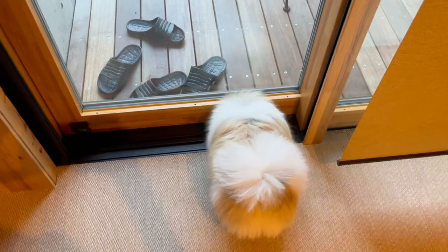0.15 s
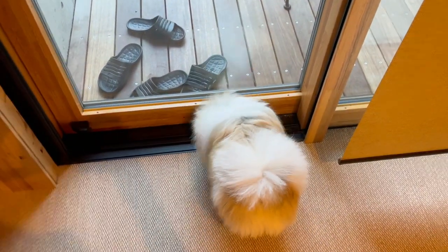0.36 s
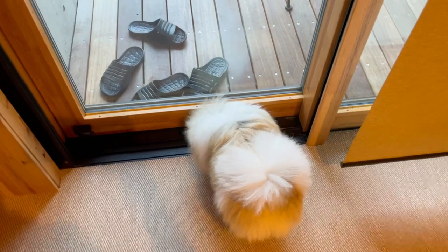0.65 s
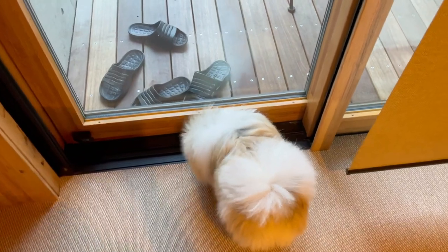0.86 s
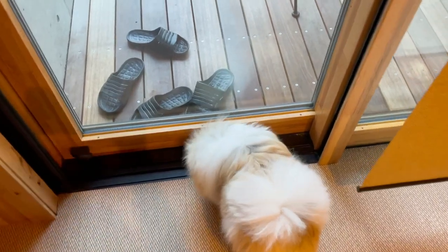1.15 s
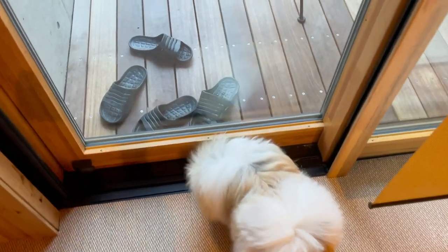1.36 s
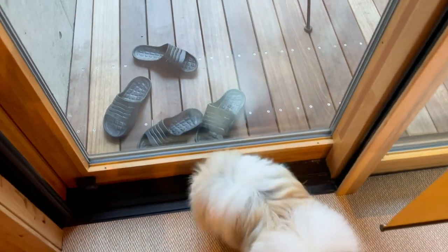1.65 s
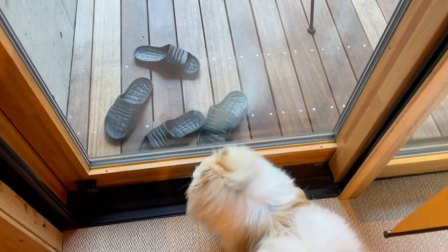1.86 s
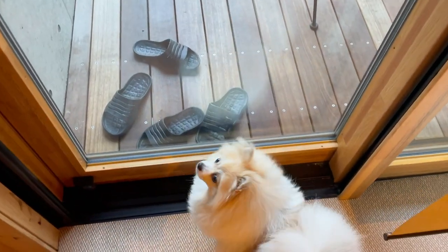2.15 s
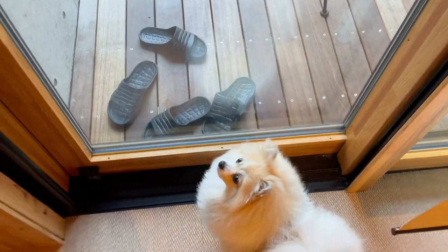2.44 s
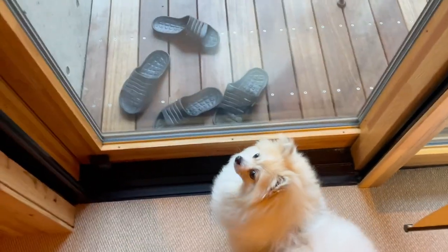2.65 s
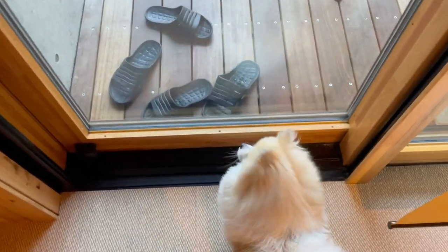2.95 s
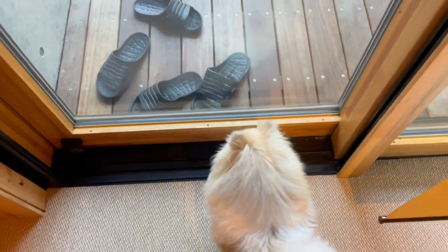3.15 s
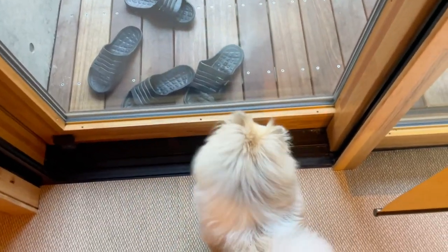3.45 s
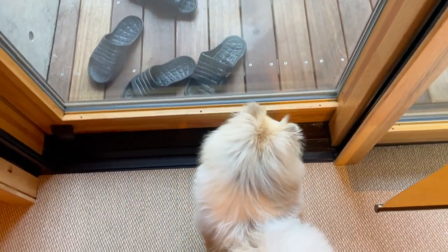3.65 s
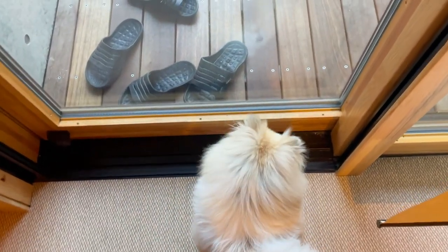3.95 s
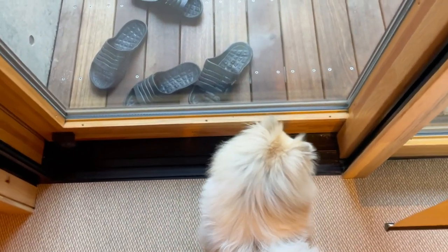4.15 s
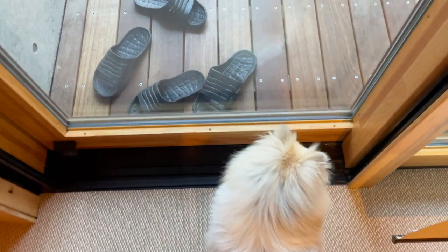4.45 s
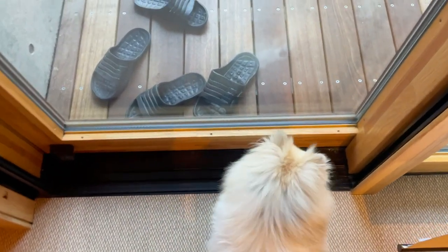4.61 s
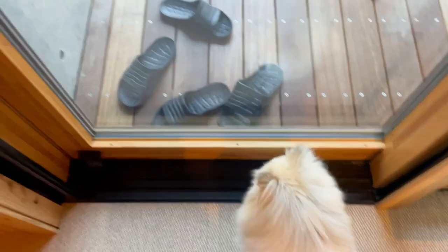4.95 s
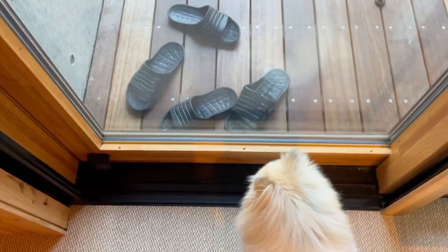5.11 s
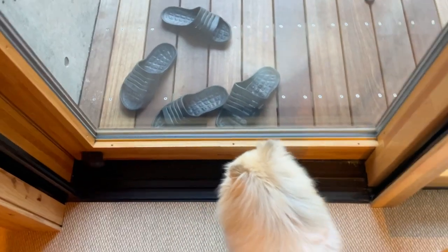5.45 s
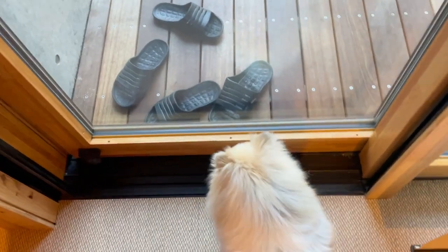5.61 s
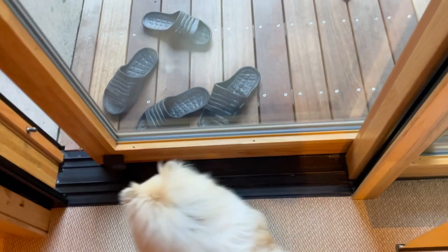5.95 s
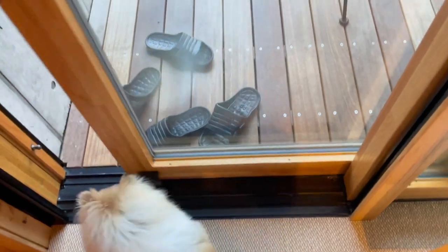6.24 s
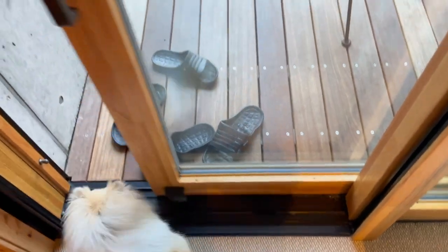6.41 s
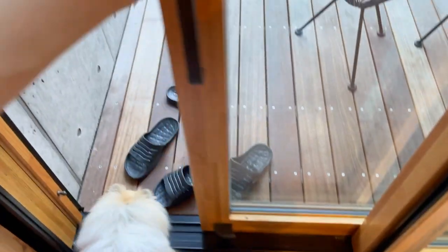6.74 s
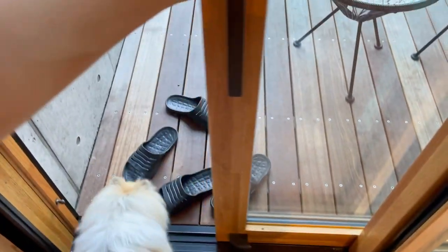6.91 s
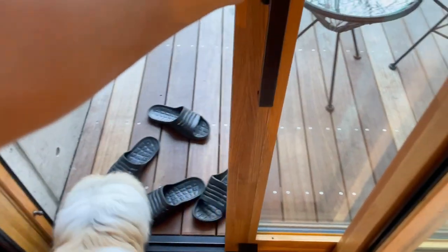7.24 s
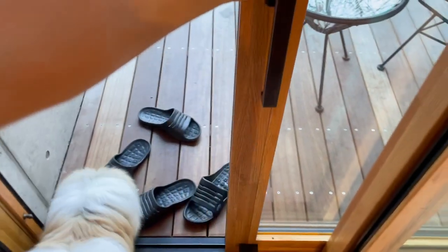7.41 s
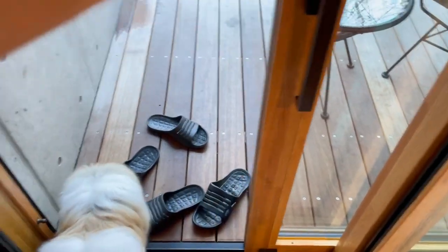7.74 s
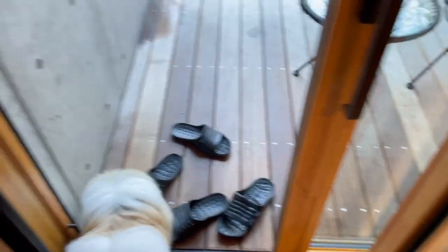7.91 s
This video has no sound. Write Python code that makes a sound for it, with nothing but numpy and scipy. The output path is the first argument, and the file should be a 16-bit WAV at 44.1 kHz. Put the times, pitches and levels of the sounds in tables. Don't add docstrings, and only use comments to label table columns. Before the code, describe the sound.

In a quiet rumbling room, soft paw steps and small metal ticks lead to a latch clunk, then a glass door scrapes and rolls open, hissing.

```python
import sys
import numpy as np
from scipy import signal
from scipy.fft import rfft, irfft, next_fast_len
from scipy.io import wavfile
from scipy.ndimage import uniform_filter1d

SR = 44100
rng = np.random.default_rng(int(sys.argv[2]) if len(sys.argv) > 2 else 0)


def invert_db(level):
    return 10 ** (np.asarray(level, dtype=float) / 20)


def master(y):
    cut = np.clip(np.atleast_2d(y).T, -1, 1)
    pcm = np.round(cut * 32767)
    wavfile.write(sys.argv[1], SR, pcm.astype(np.int16))


N = 355887
THUMP_S = 4.632

# start_s, peak_db, brightness_db, ringing_db, t60_factor
LATCH = [
    (2.104, -27, 3, 10, 1.6),
    (4.3818, -36, -16, 15, 0.9),
    (4.623, -34, -4, 5.5, 0.75),
    (4.628, -25, 0, -12, 0.95),
    (4.642, -32, -15, 10, 1.2),
]


def evened(x):
    return x / np.sqrt(np.mean(x ** 2) + 1e-20)


def read(points, hz):
    f, value = np.transpose(points)
    return np.interp(np.log(hz + 1), np.log(f + 1), value)


def add(mix, s, sound):
    part = mix[round(s * SR):][:len(sound)]
    part += sound[:len(part)]


def band(x, lo_hz, hi_hz):
    sos = signal.butter(2, [lo_hz, min(hi_hz, SR / 2.1)], "band", fs=SR, output="sos")
    return signal.sosfilt(sos, x)


def split(x, low_hz, high_hz, soft):
    size = next_fast_len(N)
    hz, spectrum = np.fft.rfftfreq(size, 1 / SR), rfft(x, size)
    low = np.clip((low_hz - hz) / (soft * low_hz), 0, 1)
    high = np.clip((hz - high_hz) / (soft * high_hz), 0, 1)
    return (irfft(spectrum * share, size)[:N] for share in (low, 1 - low - high, high))


def resonate(x, hz, width):
    turn = np.exp(2j * np.pi * np.cumsum(hz * np.ones(len(x))) / SR)
    r = np.exp(-np.pi * width / SR)
    return 2 * (turn * signal.lfilter([1 - r], [1, -r], x / turn + 1e-18)).real


def noise(tone, patchy_db, size):
    hop, hz = size // 4, np.fft.rfftfreq(size, 1 / SR)
    a, b, patches = rng.standard_normal((N // hop + 5, len(hz), 3)).T
    patches = uniform_filter1d(patches, size=7, axis=0)
    patches = evened(uniform_filter1d(patches, size=12, axis=1))
    z = (a + 1j * b) * invert_db(read(tone, hz)[:, None] + patchy_db * patches)
    return signal.istft(z, nperseg=size, noverlap=size - hop)[1][:N]


def curves(rows):
    s, *columns = np.transpose(rows)
    t = np.arange(N) / SR
    lasts = s[-1] > t[-1] - .02
    gate = np.clip(np.minimum(t - s[0], s[-1] - t + lasts) / .012, 0, 1)
    return gate, *(np.interp(t, s, c) for c in columns)


def glide(start, end, from_hz, to_hz, db, ends_db):
    on = slice(int(start * SR), min(int(end * SR), N))
    u = np.linspace(0, 1, on.stop - on.start)
    lasts = end * SR > N - 900
    edges = np.clip(np.minimum(u, 1 - u + lasts) * (end - start) / .012, 0, 1)
    droop = np.where((u > .5) & lasts, 0, (2 * u ** (1 if lasts else .7) - 1) ** 2)
    return on, from_hz + (to_hz - from_hz) * u, edges * invert_db(db + ends_db * droop)


def three_layers(x, db, body_db, fizz_db):
    body, hiss, fizz = map(evened, split(x, 2300, 8000, .3))
    return invert_db(db) * hiss + invert_db(body_db) * body + invert_db(fizz_db) * fizz


def grit(per_s, spread_db, share):
    strength = invert_db(spread_db * np.minimum(rng.exponential(1, N), 4))
    catches = strength * (rng.random(N) < per_s / SR)
    return 1 + share * evened(signal.lfilter([1], [1, -.985], catches))


def ring(modes, stretch=1, size=SR // 2, snap=0.83):
    t = np.arange(size) / SR
    return sum(invert_db(db - 60 * t / (t60 * stretch)) * np.sin(2 * np.pi * hz * t) * (1 - np.exp(-t * hz * snap))
               for hz, db, t60 in modes)


def crack(t60, bright_db, hz=2500):
    t, burst = np.arange(SR // 8) / SR, rng.standard_normal(SR // 8)
    dull = evened(band(band(burst, hz / 3.3, hz * 1.81), hz / 4, hz * 6.8)) * invert_db(-60 * t / t60)
    edge = evened(band(band(burst, 10800, 14500), 6300, 14680))
    return 0.51 * (dull + edge * invert_db(bright_db - 1.5 - 110 * t / t60))


def room():
    # pitch_hz, level_db per Hz
    room_tone = [(12, -66), (20, -30), (32, -14), (43, -13), (65, 0.5), (77, -9), (88, -28.5), (123, -21.5),
                 (222, -28.5), (337, -38), (499, -33.5), (558, -52.5), (5680, -68.5), (8650, -65.5),
                 (13300, -73), (14600, -100)]
    # start_s, level_db
    rumble_swell = [(0.0, -50), (0.22, -38.5), (0.36, -48.5), (0.56, -43), (0.87, -44), (0.97, -76),
                    (1.08, -45), (2.49, -44), (2.63, -36.5), (2.72, -49), (2.88, -37), (3.0, -43.5),
                    (4.25, -46), (4.52, -39.5), (5.03, -47.5), (5.17, -34), (5.36, -40.5), (8.07, -46.5)]
    air = invert_db(-49) * evened(noise(room_tone, patchy_db=2.5, size=2048))
    _, rumble_db = curves(rumble_swell)
    rumble, drone, hiss = split(air, 105, 330, .2)
    lumps = np.sqrt(uniform_filter1d(rumble ** 2, size=6000) + 1e-9)
    t = np.arange(N) / SR
    after, hit = np.maximum(t - THUMP_S, 0), t > THUMP_S
    shake_t60_s, boom_t60_s = .9, 0.36
    low = np.hypot(invert_db(rumble_db), hit * invert_db(-30 - 60 * after / shake_t60_s))
    drone_db = -56.5 + 1.48 * t
    high = np.hypot(invert_db(drone_db), hit * invert_db(-31 - 60 * after / boom_t60_s))
    return low * rumble / lumps + high * evened(drone) + hiss


def rustle():
    # start_s, level_db
    brushing = [(0.0, -87.5), (0.76, -93), (0.93, -84), (1.2, -81.5), (1.5, -92), (2.05, -75),
                (2.31, -57.5), (2.54, -67), (2.8, -76), (2.98, -69), (3.28, -81), (3.61, -69.5),
                (4.1, -75.5), (4.55, -69), (4.77, -64.5), (4.9, -91.5), (5.3, -64), (5.56, -72)]
    # pitch_hz, level_db per Hz
    brush_tone = [(180, -18.5), (300, 0), (354, 4), (405, 1.5), (574, -8.5), (814, -3.5), (1100, -8),
                  (4990, -20.5), (8640, -19), (12500, -9), (13600, -14), (14800, -57.5)]
    gate, db = curves(brushing)
    tread = invert_db(-85.5 + 5.5 * np.arange(N) / SR)
    body_db = 20 * np.log10(np.hypot(tread, invert_db(db + 4)))
    fizz_db = -74.5 + 0.72 * (db + 70.0)
    rub = noise(brush_tone, patchy_db=2.8, size=512) * grit(110, 4.7, 0.067)
    return gate * three_layers(rub, db, body_db, fizz_db)


def strokes():
    # start_s, length_s, level_db, pitch_hz, share of the stroke spent rising
    brushes = [(0.338, 0.12, -70.5, 3500, 1), (0.449, 0.029, -64, 6000, 0.9),
               (4.615, 0.012, -53, 4000, 0.9), (0.858, 0.19, -72.5, 5400, 0.68),
               (1.148, 0.21, -79, 6040, 0.45), (1.549, 0.066, -76.5, 4070, 0.02),
               (1.979, 0.021, -69, 7000, 0.4), (2.783, 0.17, -57, 4000, 0.2),
               (3.438, 0.16, -56, 4300, 0.54), (3.585, 0.19, -60.5, 3950, 0.4),
               (5.19, 0.031, -64, 4500, 0.5)]
    # start_s, length_s, level_db, pitch_hz
    scuffs = [(0.5, 0.063, -66, 790), (2, 0.041, -51.5, 2300), (2.318, .008, -45.5, 5900),
              (2.5, .008, -52.5, 4500), (2.478, 0.02, -58, 5000), (3, .02, -65, 4000), (2, .02, -75, 4800),
              (6.785, 0.035, -41, 2900), (6.5, 0.071, -54, 5100), (2.5, 0.15, -58, 1500),
              (2, 0.038, -45, 340), (2.5, 0.042, -46, 440), (2.5, 0.047, -50, 630), (2, 0.023, -70, 1100),
              (3.94, 0.22, -62.5, 1570), (3.85, .3, -60, 420), (4, 0.083, -54, 400), (4.385, .07, -53, 350),
              (0.8, .12, -62.5, 340), (0.0, .05, -73, 700), (0.168, .005, -76, 6500), (4, .016, -55, 3600),
              (4.5, .04, -50.5, 520), (5.5, 0.015, -58.5, 4000), (6.5, .025, -46, 4400),
              (7.1, .12, -54, 1000), (7.29, 0.11, -56, 930), (3.5, 0.075, -67, 5300),
              (6.55, 0.02, -60, 2400), (6.196, 0.022, -42, 2910), (6.5, 0.029, -39, 2730),
              (6.614, 0.02, -39.5, 2700), (6.675, 0.038, -40, 2650)]
    out, rough = np.zeros(N), rng.standard_normal(N) * grit(250, 5.0, 0.083)
    brush_fizz_db, scuff_fizz_db, scuff_rise = -3, -20.5, .3
    rows = [(*row[:4], brush_fizz_db, row[4]) for row in brushes]
    rows += [(*row, scuff_fizz_db, scuff_rise) for row in scuffs]
    for s, length, db, hz, fizz_db, rise in rows:
        u = np.linspace(0, 1, int(length * SR))
        swell = np.sqrt(np.clip(np.minimum(u / rise, (1 - u) / (1.01 - rise)), 0, 1))
        part = rough[int(s * SR):][:len(u)]
        lo_hz = hz / (1.5 if length < .04 else 2.4)
        body = band(band(part, lo_hz, min(hz * 1.59, 7800)), hz / 4, min(hz * 2.3, 8000))
        fizz = band(band(part, 9200, 14600), 8100, 14000)
        add(out, s, invert_db(db) * swell * (evened(body) + invert_db(fizz_db) * evened(fizz)))
    return out


def taps():
    # start_s, peak_db, brightness_db
    rattles = [(1.561, -55.5, -20), (1.602, -57, -14), (1.677, -60.5, -28), (1.715, -55.5, -26),
               (1.761, -63, -26), (1.802, -55.5, -22), (1.895, -54, 5), (1.931, -66, -20),
               (1.965, -51.5, -16), (2.299, -42, -24), (2.358, -37.5, -22), (4.041, -40.5, -33),
               (5.161, -35, -31), (5.31, -28.5, -30), (5.456, -36, -34), (5.951, -28, -22)]
    # start_s, peak_db, pitch_hz, brightness_db
    knocks = [
        (0.176, -50, 600, -16),
        (0.429, -45, 850, -14),
        (0.471, -36, 800, -12),
        (2.814, -41, 1200, -14.5),
        (3.632, -40, 875, -24),
        (3.828, -47, 750, -15),
        (3.975, -45, 650, -28),
        (4.086, -34, 480, -23),
        (4.418, -43, 2400, -9),
        (5.586, -33, 1780, -39),
    ]
    # start_s, peak_db, pitch_hz, brightness_db
    ticks = [(1.552, -64, 4000, 5), (1.851, -50.5, 4580, 11), (1.989, -67, 760, 0), (2.075, -50, 3350, 1),
             (2.266, -34, 1910, -9), (2.32, -32, 940, -18), (2.497, -33, 2700, 4), (2.789, -44, 2410, -15),
             (2.994, -45, 750, 11.5), (4.34, -49.5, 3500, 2), (5.42, -42.5, 835, -10)]
    return ([(s, db, 1078, 0.12, bright_db, 0.52) for s, db, bright_db in rattles]
            + [(s, db, hz, 0.064, bright_db, 0.84) for s, db, hz, bright_db in knocks]
            + [(s, db, hz, 0.049, bright_db, 0.29) for s, db, hz, bright_db in ticks])


def hits():
    # pitch_hz, level_db, t60_s
    thump = [
        (190, -15.5, .09),
        (58, -24, .25),
        (253, -27, .06),
    ]
    out = np.zeros(N)
    for s, db, hz, t60, bright_db, tone in taps():
        tone = np.clip(tone, 0, 1)
        modes = [(hz, 4, .25 * t60), (1.25 * hz, -2, .2 * t60), (.45 * hz, -4, .4 * t60)]
        knock = ring(modes, size=SR // 8)
        add(out, s, invert_db(db) * ((1 - tone) * crack(t60, bright_db, hz) + tone * knock))
    for k, (s, db, bright_db, ring_db, stretch) in enumerate(LATCH):
        add(out, s, invert_db(db) * crack(0.077 * stretch, bright_db))
        frame_db = db - (7 if k else 34)
        add(out, s, invert_db(frame_db) * crack(0.27 * stretch, -67.0, 650))
    add(out, THUMP_S, ring(thump, snap=4.0))
    return out


def chinks():
    # start_s, peak_db, pitch_hz
    metal = [(0.177, -59.5, 1190), (0.472, -55.5, 2270), (1.553, -64, 4670), (1.588, -69, 1780),
             (1.714, -64, 3450), (1.74, -74, 3900), (1.802, -58.5, 3350), (1.851, -54, 4600),
             (1.853, -61, 2000), (1.872, -48, 940), (1.896, -57, 3260), (1.966, -65, 3400),
             (2.073, -51, 3500), (2.265, -49, 3100), (2.274, -50, 1860), (2.301, -48, 3880),
             (2.313, -45, 3080), (2.312, -35, 1010), (2.323, -41, 4160), (2.325, -39.5, 2210),
             (2.343, -48, 2800), (2.363, -49.5, 2500), (2.389, -41, 1040), (2.452, -58, 3370),
             (2.484, -39.5, 1200), (2.499, -34.5, 2690), (2.499, -38, 3330), (2.526, -44, 1500),
             (2.563, -47, 1120), (2.788, -50, 2480), (3.632, -50, 2410), (3.636, -51, 4300),
             (3.686, -48.5, 1100), (3.975, -50, 2580), (4.086, -50, 1910), (4.34, -47, 4320),
             (4.343, -50.5, 5070), (4.391, -36, 2400), (4.419, -52.5, 4900), (4.62, -36.5, 6710),
             (4.622, -36, 13000), (4.6285, -29.5, 4760), (4.627, -24, 12300), (4.633, -39, 13600),
             (4.6555, -36, 4870), (4.657, -32, 2400), (4.669, -42, 4950), (5.202, -54.5, 3710),
             (5.576, -48, 2220), (5.587, -34, 1880), (5.311, -45.5, 5180), (4.631, -29, 520),
             (4.626, -35, 1150), (2.996, -50.5, 1300), (2.27, -42, 1050)]
    # start_s, peak_db, pitch_hz
    joints = [(6.199, -33, 2590), (6.199, -40, 3730), (6.445, -36, 3100), (6.455, -34, 4300),
              (6.445, -40, 1500), (6.617, -36, 2530), (6.625, -40, 3900), (6.672, -36, 2830),
              (6.69, -35.5, 2000), (6.7, -35, 4100), (7.316, -42, 2670), (7.665, -42, 2690)]
    rows = [*metal, *joints]
    out, size, t60_s, rough = np.zeros(N), SR // 16, .03, 1.2
    spits = rng.standard_normal((len(rows), size))
    fading = invert_db(-60 * np.arange(size) / SR / t60_s)
    for (s, db, hz), spit in zip(rows, spits):
        pair = ring([(hz, -4, t60_s), (hz * 1.06, -11, t60_s)], size=size)
        wide = min(.22 * hz, 1200)
        spit = evened(resonate(resonate(spit, hz, wide), hz, 2 * wide))
        add(out, s, invert_db(db) * (pair + .5 * rough * fading * spit))
    return out


def whistles():
    # start_s, end_s, from_hz, to_hz, level_db
    groans = [
        (0.5, 9.9, 64.5, 64.6, -43.5),
        (5.8, 6.8, 684, 630, -52),
        (5.95, 6.88, 786, 894, -50.5),
        (6, 8.07, 121, 130, -47),
        (6.2, 6.8, 185, 170, -50),
    ]
    gap_air = [
        (5.5, 5.84, 2000, 2800, -51.5),
        (6.74, 7.62, 1830, 2730, -45.5),
        (6.75, 7.3, 4100, 4300, -52),
        (5.58, 5.8, 3600, 3500, -54),
        (6.2, 6.8, 4660, 4900, -52.5),
        (5.95, 6.5, 4260, 3800, -49.5),
        (7.3, 8.07, 1500, 1930, -58),
        (7.65, 8.07, 2500, 2930, -57),
    ]
    squeaks = [(1.56, 2.0, 1070, 1080, -73.5), (2.05, 2.16, 1080, 1080, -59),
               (2.33, 2.49, 13000, 12700, -64), (2.55, 2.65, 10400, 10400, -70),
               (2.58, 2.635, 6300, 6800, -69), (2.63, 2.665, 6700, 6000, -68),
               (2.51, 2.565, 6600, 6400, -70), (5.05, 5.12, 7900, 9900, -73.5),
               (5.22, 5.4, 12900, 12000, -66), (5.53, 5.56, 1170, 1470, -50), (4.98, 5.13, 1000, 1070, -66),
               (0.92, 1.2, 1900, 2100, -82), (5.47, 5.53, 1500, 2300, -60)]
    track_rings = [(6.07, 6.22, 5300, 5100, -51), (6.24, 6.44, 5020, 5230, -54),
                   (6.5, 6.8, 5210, 5000, -51), (6.09, 6.19, 5900, 6350, -57), (6.19, 6.4, 3600, 3850, -52),
                   (6.2, 6.42, 3100, 3070, -57), (6.2, 6.36, 2500, 2300, -55),
                   (6.5, 6.92, 4150, 4100, -51.5), (6.68, 6.76, 2830, 2830, -50),
                   (6.76, 6.9, 2000, 1950, -49.5), (6.92, 7.06, 2030, 2150, -51),
                   (6.88, 7.1, 4750, 4650, -53), (6.9, 7.1, 3650, 3600, -56), (7.1, 7.6, 2950, 2740, -58),
                   (7.25, 7.45, 4850, 4750, -56), (7.66, 7.8, 2700, 2750, -52.5),
                   (7.66, 7.95, 3250, 3380, -54.5), (7.68, 8.07, 1720, 1750, -64),
                   (7.7, 8.07, 4700, 4830, -65)]
    squeals = [
        (6.2, 6.46, 14200, 15200, -58),
        (6.47, 6.74, 14800, 15100, -51),
        (6.72, 7.05, 14800, 15400, -55),
    ]
    hums = [
        (5.6, 6.263, 262.2, 263, -54),
        (7.25, 8.07, 312, 311, -51.5),
        (7.2, 8.071, 233.2, 232, -56),
    ]
    out, rubbing = np.zeros(N), rng.standard_normal(N)
    wobble = 170 * np.sin(2 * np.pi * 9 * np.arange(N) / SR)
    ends_db, air_ends_db = -6, -12
    # table, width Hz, widening per Hz of pitch, share of the wobble
    kinds = [(groans, 3.4, 0.067, 0), (gap_air, 800, 0, 0), (squeaks, 130, 0, 0),
             (track_rings, 184, 0, 0), (squeals, 360, 0, 1)]
    for rows, width, widens, wobbles in kinds:
        for row in rows:
            on, hz, level = glide(*row, air_ends_db if width > 500 else ends_db)
            hz = hz + wobbles * wobble[on]
            wide = width + widens * hz[0]
            out[on] += level * evened(resonate(resonate(rubbing[on], hz, wide), hz, 2 * wide))
    waver = 1 + 0.071 * evened(uniform_filter1d(rubbing, size=3000))
    for row in hums:
        on, hz, level = glide(*row, ends_db)
        out[on] += np.sqrt(2) * level * waver[on] * np.sin(2 * np.pi * np.cumsum(hz) / SR)
    return out


def latch_rings():
    # pitch_hz, level_db, t60_s
    latch_modes = [(1080, -20, .08), (1550, -35, .08), (1938, -20, .09), (2390, 1, .052), (2525, -11, .06),
                   (2390, -31, .6), (2945, -19, .1), (3500, -21, .05), (4447, -23, .06), (4764, -6, .032),
                   (4764, -35, .6), (5250, -27, .14), (5730, -31, .1), (12400, -14, .025)]
    # pitch_hz, level_db, t60_s
    bolt_modes = [(2450, 0, .02), (2250, -7, .014), (560, -6, .04), (5050, -15, .012), (3200, -15, .01),
                  (1200, -13, .03), (800, -13, .04)]
    out = np.zeros(N)
    for k, (s, db, bright_db, ring_db, stretch) in enumerate(LATCH):
        modes = bolt_modes if k else latch_modes
        size = SR // 4 if k else int(.19 * SR)
        add(out, s, invert_db(db + ring_db) * ring(modes, stretch, size=size, snap=.4 if k else .3))
    return out


def hollows(hz, t):
    # start_s, end_s, pitch_hz, width_hz, depth_db
    slots = [
        (6.17, 6.45, 1630, 390, -7.5),
        (6.47, 6.8, 1550, 350, -5),
        (6.19, 6.6, 6230, 650, -7),
        (7.8, 7.42, 1540, 300, -5),
        (6.02, 6.19, 2740, 400, -4.5),
        (5.45, 5.95, 5700, 960, -5.5),
    ]
    return sum(db * np.exp(-((hz[:, None] - centre_hz) / width) ** 2) * ((t > start) & (t < end))
               for start, end, centre_hz, width, db in slots)


def slide():
    # start_s, level_db
    pressure = [
        (5.46, -62.5),
        (5.81, -45),
        (6.24, -43.5),
        (6.32, -46.5),
        (6.99, -41),
        (7.6, -48.5),
        (7.655, -55),
        (7.668, -48),
        (8.07, -52),
    ]
    # pitch_hz, level_db per Hz
    seal_tone = [(200, -10.5), (330, -5.5), (480, -7.5), (1000, -10), (1600, -12.5), (2400, -5.5),
                 (3500, -5.5), (5000, -5.5), (6500, -15.5), (8000, -23.5), (9700, -26.5), (10700, -19.5),
                 (12800, -15), (14500, -21.5), (16000, -25.5)]
    gate, db = curves(pressure)
    rub = noise(seal_tone, patchy_db=1.6, size=512) * grit(200, 5.0, 0.1)
    hz, t, z = signal.stft(rub, SR, nperseg=2048)
    modes = evened(uniform_filter1d(rng.standard_normal(z.shape), size=14, axis=1))
    streaked = signal.istft(z * invert_db(5.2 * modes + hollows(hz, t)), SR, nperseg=2048)[1][:N]
    now_s = np.arange(N) / SR
    slack = np.clip(1 - (now_s - pressure[0][0]) / 0.14, 0, 1)
    roll_db = -50.5 - 2.5 * np.maximum(now_s - 6.6, 0)
    seal_db = -57 + 0.57 * (db + 45.0) - 15 * slack
    return gate * three_layers(streaked, db, roll_db, seal_db)


def scrape():
    # start_s, level_db, pitch_hz of the main ring
    scraping = [
        (5.815, -38, 1300),
        (5.84, -39, 1760),
        (6.0, -38.5, 1824),
    ]
    on = slice(int(scraping[0][0] * SR), int(scraping[-1][0] * SR))
    gate, db, hz = (column[on] for column in curves(scraping))
    slips_per_s = 130 * (1 + 6.7 * uniform_filter1d(rng.standard_normal(N), size=300))
    turns = np.cumsum(slips_per_s) / SR
    drive = ((1.2 + np.exp(-(turns % 1) / 0.26)) * rng.standard_normal(N))[on]
    main = resonate(resonate(drive, hz, 130), hz, 350)
    upper = resonate(resonate(drive, 2280, 550), 2280, 900)
    out = np.zeros(N)
    out[on] = gate * invert_db(db) * evened(main + .42 * upper)
    return out


def tail(length_s, scale):
    # pitch_hz, t60_s
    decay = [(200, 0.32), (1000, 0.21), (4000, 0.26), (12000, 0.14)]
    hz, t, z = signal.stft(rng.standard_normal(int(length_s * SR)), SR, nperseg=128)
    fall_db = -60 * t / (scale * read(decay, hz)[:, None])
    fading = signal.istft(z * invert_db(fall_db), SR, nperseg=128)[1]
    return fading / np.linalg.norm(fading)


def scene():
    knocks, answer = hits() + strokes(), tail(0.49, 1.0)
    steady = room() + rustle() + slide() + whistles() + scrape()
    knocks = knocks + chinks()
    rings = latch_rings()
    wet = invert_db(-8.5) * knocks + invert_db(-17) * rings
    mid = steady + knocks + rings + signal.fftconvolve(wet, answer)[:N]
    mid = mid * np.minimum(np.arange(N) / 200, 1)
    return np.array([mid, mid])


def band_limit(x):
    return signal.sosfilt(signal.butter(12, 16840, fs=SR, output="sos"), x)


def record(dry):
    # pitch_hz, level_db of side over mid
    side_tone = [(60, -27), (92, -16.5), (140, -19), (210, -14.5), (330, -12), (500, -4.5), (770, -7),
                 (1170, -2), (1790, -4), (2740, -6.5), (4190, -5.5), (6410, -3), (8000, 3.5), (9810, 7),
                 (15000, -21.5)]
    # pitch_hz, level_db
    notch = [(30, -20.5), (48, -0.5), (7000, -0.5), (7800, -3), (9500, -4.5), (10200, -1), (15500, 2.5),
             (15850, -38.5)]
    size = next_fast_len(N + SR // 2)
    hz, spectrum = np.fft.rfftfreq(size, 1 / SR), rfft(dry.mean(0), size)
    scattered = 0.82 * rfft(tail(.5, 0.8), size)
    lean, turned = .25, 0.8
    side = irfft(spectrum * invert_db(read(side_tone, hz)) * (lean - 1j * turned + scattered), size)[:N]
    mid = irfft(spectrum * invert_db(read(notch, hz)), size)[:N]
    mid = mid + invert_db(-96) * evened(band(rng.standard_normal(N), 7500, 12000))
    return band_limit(np.array([mid + side, mid - side]))


dry = scene()
out = record(dry)
master(out)
```